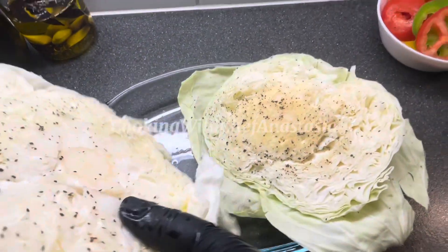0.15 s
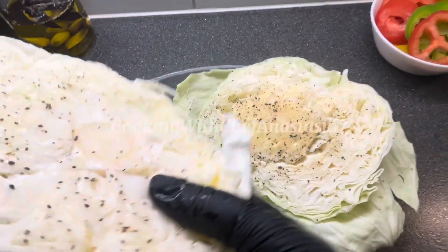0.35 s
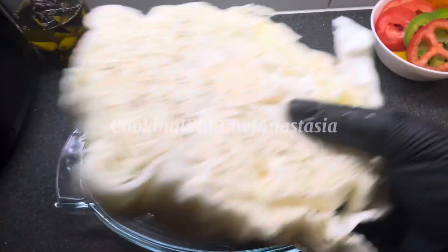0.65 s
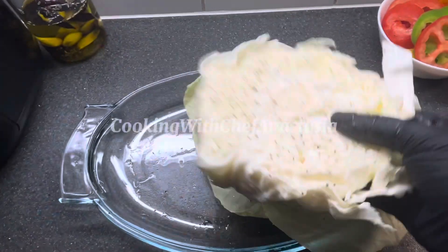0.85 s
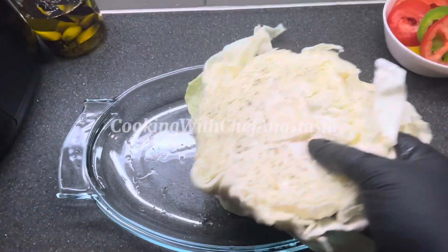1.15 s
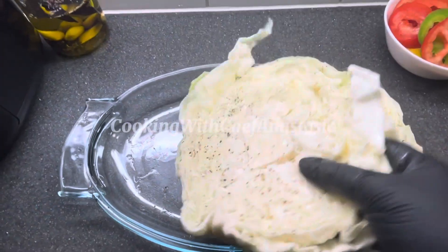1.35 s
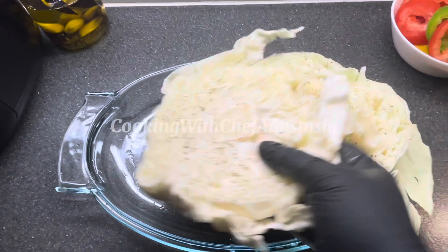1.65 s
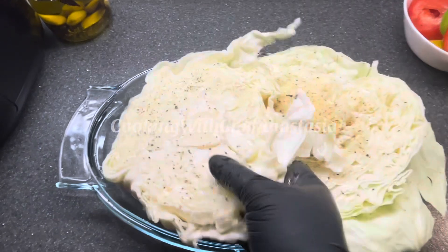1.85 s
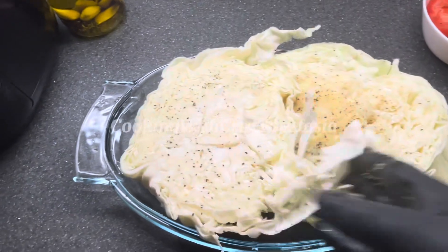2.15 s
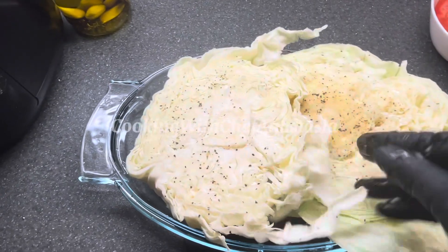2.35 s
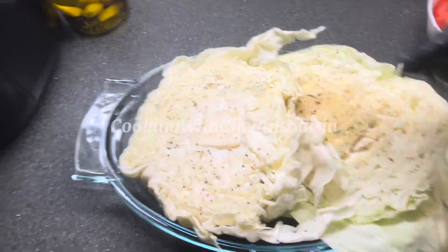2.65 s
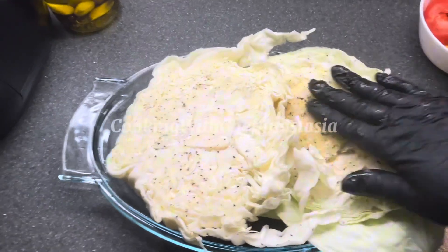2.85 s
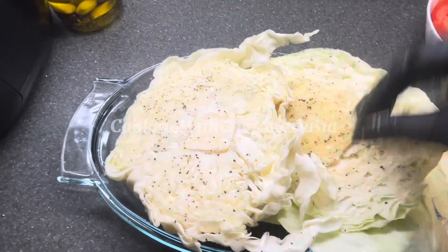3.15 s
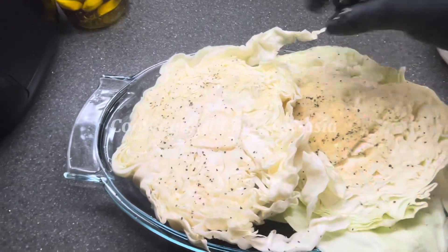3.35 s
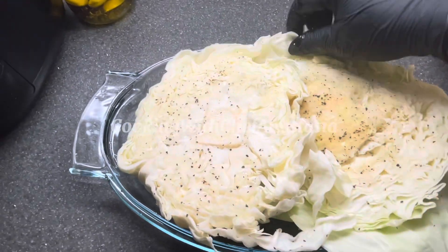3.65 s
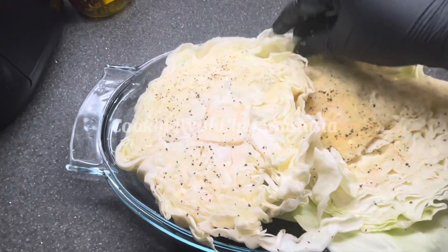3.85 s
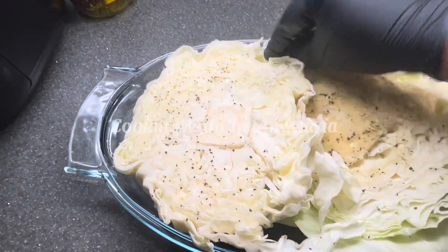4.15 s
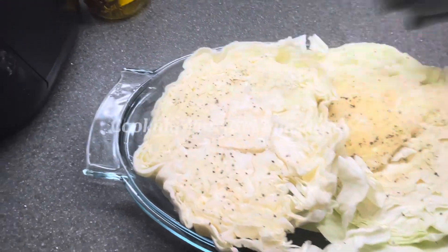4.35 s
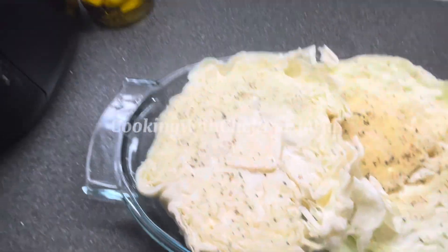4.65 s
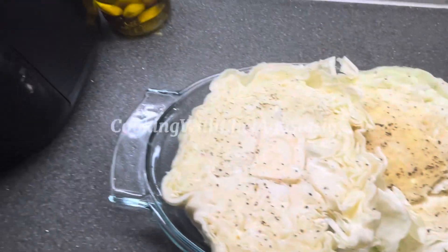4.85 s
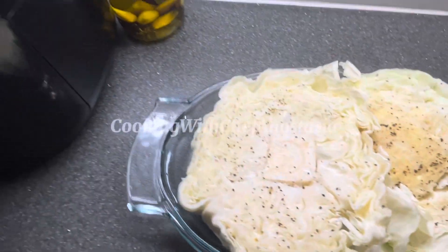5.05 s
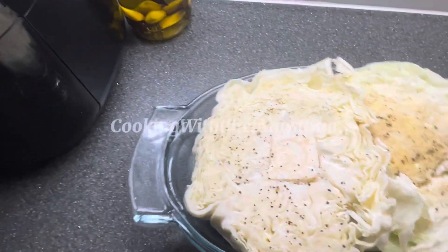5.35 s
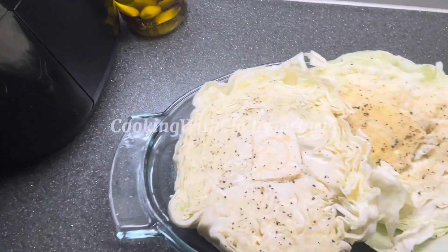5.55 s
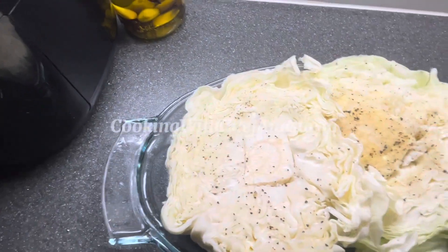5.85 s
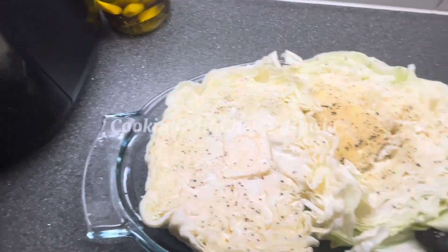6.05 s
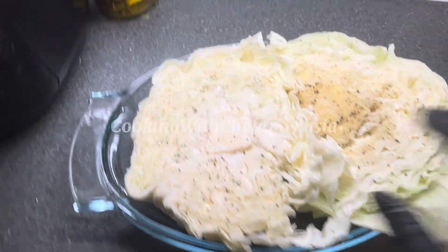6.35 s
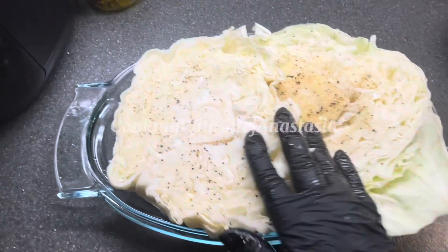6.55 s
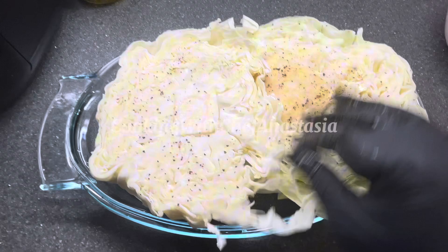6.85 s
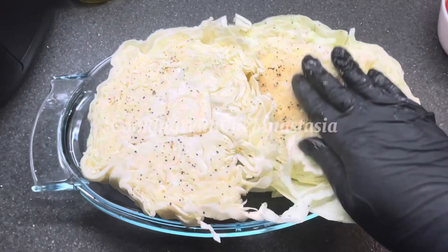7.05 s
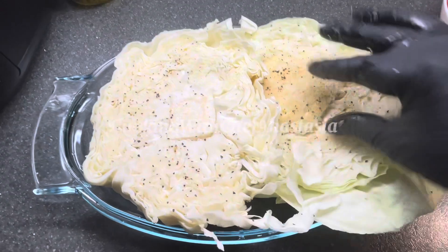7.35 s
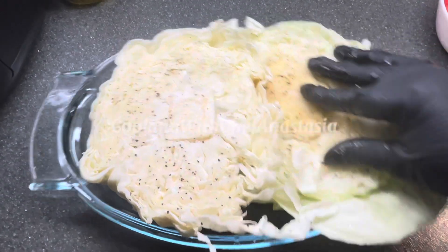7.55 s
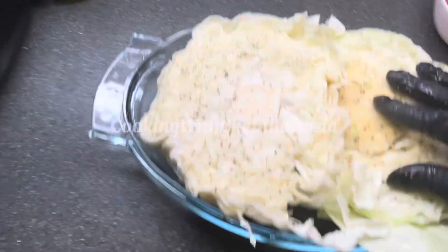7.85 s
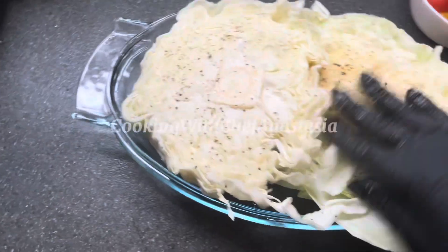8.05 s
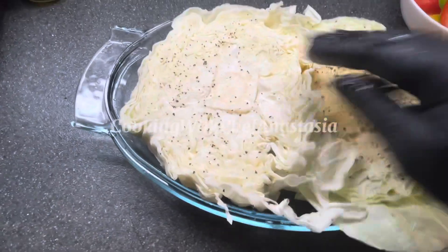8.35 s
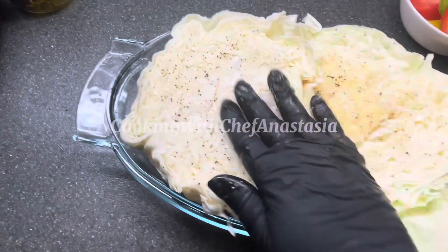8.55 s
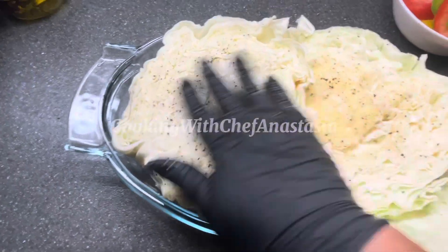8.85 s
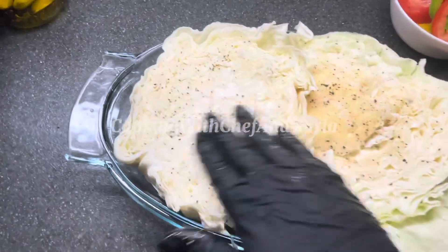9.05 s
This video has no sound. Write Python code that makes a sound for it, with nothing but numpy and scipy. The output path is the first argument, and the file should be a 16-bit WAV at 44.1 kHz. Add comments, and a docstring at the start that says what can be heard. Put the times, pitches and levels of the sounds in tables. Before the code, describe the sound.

Close, dry kitchen sound over a quiet, wavering low hum and room rumble, with very faint higher appliance tones sinking in the first second. A crisp tick opens, with a cluster of tiny fibre ticks from 0.2 to 0.6. Leafy crunches start near 0.8, with a soft thump just before 1.0; rustling builds to sharp snaps and the deepest thump at 1.8. A dull dish knock follows at 2.25, then a low bump and brief crunch at 2.8. After a lull, crackling returns at 3.5 and becomes a dense, bright crunch around 3.9-4.2. Between 4.7 and 5.9, bent ribs creak and snap, with low thumps at 5.0 and 5.3. Bright leaf snaps come near 6.1, rustles at 6.5 and a sharp tick at 7.1. A muffled double bump lands at 7.85. Light rustling from 8.5 leads to crisp crunches and faint glassy taps near 9.0, then one loud, bright snap at 9.15.

```python
"""Raw cabbage slices crackle and snap as a gloved hand presses them into a glass dish on a kitchen counter.
Leaves, ticks and glove slips are shaped noise; bent ribs creak and glass taps ring as short sine bursts.
Noise through damped modes sounds the loaded dish; the counter adds rumble and two-mode thumps.
An appliance hums behind as slowly wavering sines over low room rumble; a close two-port phone hears it all."""
import sys
import numpy as np
from scipy import signal
from scipy.fft import rfft, irfft, next_fast_len
from scipy.io import wavfile
from scipy.ndimage import uniform_filter1d, map_coordinates

SR = 44100
rng = np.random.default_rng(int(sys.argv[2]) if len(sys.argv) > 2 else 0)


def pcm_store(signal):
    """Save signal as 16-bit PCM."""
    levels = np.round(np.clip(np.atleast_2d(signal), -1, 1) * 32767)
    wavfile.write(sys.argv[1], SR, levels.astype(np.int16).T)


def volts_from_decibels(level):
    """Turn decibel levels (scalar or array-like) into linear amplitude factors."""
    exponent = np.asarray(level, float) / 20
    return 10 ** exponent


N = 405719
T = np.arange(N) / SR

# colour of thin crisp leaf edges: f/Hz, level/dB
EDGE_COLOUR = [(2500, -16), (4200, -10.5), (6500, -3.5), (8500, -3.5), (10500, 1), (11500, -6),
               (12500, -17.5), (14000, -37), (15800, -30), (16300, -90)]
# colour of thick leaf ribs: f/Hz, level/dB
RIB_COLOUR = [(350, -9), (800, -0.5), (1100, -2), (1500, -3.5), (2300, -0.5), (3800, -5), (5500, -8.5),
              (8000, -47)]


def unit(x):
    """Scaled to rms 1."""
    return x / np.sqrt(np.mean(x ** 2) + 1e-20)


def along(points, hz):
    """Interpolates (f/Hz, value) points on a log frequency axis."""
    f, v = np.transpose(points)
    return np.interp(np.log(hz + 1), np.log(f + 1), v)


def wobble(knots_per_s):
    """A smooth random curve."""
    knots = rng.standard_normal(int(N * knots_per_s / SR) + 4)
    return map_coordinates(knots, [T * knots_per_s])


def filtered(x, response):
    """x times a complex response of frequency."""
    m = next_fast_len(N + 8192)
    return irfft(rfft(x, m) * response(np.fft.rfftfreq(m, 1 / SR)), m)[..., :N]


def noise(colour):
    """Two unrelated noises of one colour, rms 1."""
    return unit(filtered(rng.standard_normal((2, N)), lambda hz: volts_from_decibels(along(colour, hz))))


def decays(times_s, levels_db, t60s_s, rise_s):
    """Sum of envelopes that rise fast and die away."""
    env = np.zeros(N + SR)
    for s, db, t60 in zip(times_s, levels_db, t60s_s):
        t = np.arange(int(t60 * SR)) / SR
        env[round(s * SR):][:len(t)] += volts_from_decibels(db - 60 * t / t60) * (1 - np.exp(-t / rise_s))
    return env[:N]


def crackle(rate_hz, spread_db, life_s, smooth):
    """Envelope of many tiny fractures of very unequal size over a smooth share."""
    sizes = volts_from_decibels(spread_db * rng.exponential(size=N).clip(0, 4))
    hits = (rng.random(N) < rate_hz / SR) * sizes
    grains = signal.lfilter([1], [1, -np.exp(-1 / (life_s * SR))], hits)
    return unit(smooth + unit(grains))


def effort(times_s, holds_s, levels_db, rise_db_per_s, fall_db_per_s, rest_db):
    """Gain: each effort climbs at a steady dB rate, holds and sinks; powers add over a resting level."""
    t = np.arange(0, N + 64, 64) / SR
    late = t - np.reshape(times_s, (-1, 1))
    after_hold = np.maximum(late - np.reshape(holds_s, (-1, 1)), 0)
    lost_db = rise_db_per_s * np.maximum(-late, 0) + fall_db_per_s * after_hold
    power = np.sum(volts_from_decibels(np.reshape(levels_db, (-1, 1)) - lost_db) ** 2, axis=0) + volts_from_decibels(rest_db) ** 2
    return np.interp(T, t, np.sqrt(power))


def hand():
    """Gains of edges and ribs as the hand strokes the leaves; between strokes a faint steady hiss remains."""
    # strokes: t/s of full effort, hold/s, settling rate/(dB/s), edge level/dB, ribs over edges/dB
    strokes = [(0.008, 0.27, 36, -73, 10.5), (0.866, 0.2, 22, -51.5, 0.5), (1.146, 0.14, 154, -48.5, 2.5),
               (1.632, 0.29, 54, -43, -4), (2.782, 0.22, 60, -51, -5), (3.583, 0.14, 50, -55.5, -0.5),
               (3.968, 0.12, 186, -40.5, -3.5), (4.823, 0.43, 35, -53, 3), (5.404, 0.44, 103, -55.5, 2.5),
               (6.107, 0.024, 81, -54, 4), (6.563, 0.066, 61, -44, -9), (7.04, 0.086, 79, -50, -1),
               (7.525, 0.59, 123, -53.5, 1.5), (8.5, 0.34, 45, -49, -9), (8.855, 0.04, 40, -54, 5)]
    swell_db_per_s, rest_edges_db, rest_ribs_db = 106, -65.5, -71.5
    s, hold, settle, db, rib_db = np.transpose(strokes)
    edge_gain = effort(s, hold, db, swell_db_per_s, settle[:, None], rest_edges_db)
    rib_gain = effort(s, hold, db + rib_db, swell_db_per_s, settle[:, None], rest_ribs_db)
    return edge_gain, rib_gain


def weight():
    """Gains of counter and dish body as weight shifts on the dish."""
    # pushes: t/s, counter level/dB, dish and cabbage body level/dB
    pushes = [(1.0, -41, -51), (1.88, -37, -51), (4.05, -48, -68), (5.1, -38, -68), (7.601, -43.5, -69),
              (7.86, -35.5, -39)]
    lean_db_per_s, lift_db_per_s, rest_counter_db, rest_body_db = 79, 161, -52, -79
    s, counter_db, body_db = np.transpose(pushes)
    counter_gain = effort(s, 0, counter_db, lean_db_per_s, lift_db_per_s, rest_counter_db)
    body_gain = effort(s, 0, body_db, lean_db_per_s, lift_db_per_s, rest_body_db)
    return counter_gain, body_gain


def crunch(length_s, edge_db, rib_db, rib_hz, swell, tail_t60_s):
    """One burst: it swells, lasts while the leaf gives way, then dies in the room."""
    t = np.arange(next_fast_len(round((length_s + 0.11) * SR))) / SR
    fade_db = 60 * np.maximum(t - length_s, 0) / tail_t60_s + 3 * t / length_s
    env = (1 - np.exp(-t / (swell * length_s))) * volts_from_decibels(-fade_db)
    # slower tail, stronger after a long break
    tail = volts_from_decibels(-60 * t / 0.19) * length_s / (length_s + 0.0043) * (t > length_s)
    env = np.maximum(env, tail)

    hz = np.fft.rfftfreq(len(t), 1 / SR)
    # the bent rib rings in one band above the broad colour, most clearly in a short snap
    clear = 0.024 / length_s
    band = clear / (1 + (7 * (hz / rib_hz - rib_hz / (hz + 1))) ** 2)

    def burst(spectrum):
        return unit(irfft(rfft(rng.standard_normal((2, len(t)))) * spectrum, len(t)))

    edges = burst(volts_from_decibels(along(EDGE_COLOUR, hz)))
    ribs = burst(volts_from_decibels(along(RIB_COLOUR, hz)) * (0.5 + band))
    return env * (volts_from_decibels(edge_db) * edges + volts_from_decibels(rib_db) * ribs)


def leaves():
    """Thin edges and thick ribs break in clumps: a fine rustle with distinct crunches on top."""
    # crunches and snaps: t/s, length/s, edge level/dB, rib level/dB, rib ring f/Hz
    crunches = [(0.235, 0.0091, -45, -49, 3500), (0.767, 0.043, -35.5, -38.5, 2550),
                (0.849, 0.036, -33.5, -38, 1510), (1.273, 0.033, -35.5, -37.5, 2200),
                (1.355, 0.039, -39.5, -51, 2920), (1.409, 0.0098, -38.5, -64, 4500),
                (1.495, 0.026, -38, -53, 3000), (1.803, 0.018, -28.5, -33, 2330),
                (2.778, 0.022, -36.5, -35.5, 1040), (2.794, 0.021, -41, -36, 980),
                (3.654, 0.02, -32, -39.5, 1210), (3.696, 0.006, -29.5, -36.5, 1040),
                (3.752, 0.024, -32, -47.5, 1423), (3.853, 0.0088, -34.5, -54, 750),
                (3.892, 0.018, -30, -47.5, 1560), (3.964, 0.06, -24, -35, 2260),
                (4.036, 0.017, -25.5, -36.5, 1330), (4.068, 0.027, -25.5, -49, 2840),
                (4.137, 0.04, -31, -46, 4000), (4.188, 0.012, -30.5, -47, 1390),
                (4.793, 0.014, -38, -35.5, 1780), (4.902, 0.014, -31.5, -34.5, 796),
                (5.032, 0.049, -38, -36.5, 2770), (5.261, 0.061, -34.5, -36, 2780),
                (5.331, 0.0121, -35, -35, 960), (5.569, 0.041, -35, -37.5, 3220),
                (5.647, 0.025, -40, -40, 1990), (6.103, 0.021, -36, -42, 3450),
                (6.462, 0.057, -35.5, -44, 1690), (6.632, 0.028, -35, -44.5, 715),
                (6.677, 0.078, -41.5, -49.5, 860), (7.131, 0.011, -30, -37.5, 3600),
                (7.391, 0.024, -40.5, -46, 2640), (7.851, 0.024, -40, -39.5, 850),
                (8.47, 0.023, -38.5, -34, 2300), (8.96, 0.0073, -30, -41, 1570),
                (9.035, 0.018, -28.5, -50, 2620)]
    edge_gain, rib_gain = hand()
    clumps_db = 0.85 * wobble(30)
    edges = edge_gain * volts_from_decibels(clumps_db + 2.6 * wobble(11)) * noise(EDGE_COLOUR)
    ribs = rib_gain * volts_from_decibels(clumps_db) * noise(RIB_COLOUR)
    rustle = (edges + ribs) * crackle(rate_hz=700, spread_db=4.3, life_s=0.0007, smooth=1.5)
    # the rustle is kept below about 12 kHz
    rustle = filtered(rustle, lambda hz: volts_from_decibels(along([(11800, -0.5), (12800, -64)], hz)))

    bursts = np.zeros((2, N + SR))
    for s, *row in crunches:
        one = crunch(*row, swell=0.15, tail_t60_s=0.15)
        bursts[:, round(s * SR):][:, :one.shape[1]] += one
    return rustle + bursts[:, :N] * crackle(rate_hz=330, spread_db=3.2, life_s=0.0015, smooth=1.1)


def dish():
    """Rubbing and knocks drive the damped modes of the loaded dish."""
    # dull knocks: t/s, level/dB, t60/s
    knocks = [(0.934, -34, 0.15), (1.411, -42, 0.22), (1.739, -35.5, 0.092), (1.801, -29.5, 0.21),
              (2.245, -29.5, 0.51), (2.49, -45.5, 0.23), (4.002, -38, 0.11), (5.342, -33, 0.095),
              (7.516, -44, 0.3), (7.838, -37, 0.13)]
    # modes of the loaded dish: f/Hz, width/Hz, level/dB
    dish_modes = [(248, 22, -10), (330.5, 22, 3.5), (401.5, 62, 5), (510, 66, 1.5), (644, 56, 3.5),
                  (739, 58, -2.5), (980, 68, -5)]
    rub_db, rub_follows = -61, 0.43  # rms level; dB gained per dB of hand effort
    s, db, t60 = np.transpose(knocks)
    rub = volts_from_decibels(rub_db) * unit(hand()[1] ** rub_follows)
    steady = np.hypot(rub, weight()[1]) * volts_from_decibels(3.9 * wobble(25))
    force = steady + decays(s, db, t60, rise_s=0.0016)

    def dull_modes(f):
        total = 0
        for k, (centre, width, gain_db) in enumerate(dish_modes):
            mode = 1j * f * width / (centre * centre - f * f + 1j * f * width)
            total = total + (-1) ** k * volts_from_decibels(gain_db) * mode
        # the dish sounds only dull, below about 1.4 kHz
        return total / (1 + (f / 1400) ** 4)

    return force * unit(filtered(rng.standard_normal((2, N)), dull_modes))


def counter():
    """Shifting weight rumbles in the counter; each thump is a few swings of two low modes."""
    # thumps: t/s, level/dB, lower mode f/Hz
    thumps = [(0.957, -21, 192), (1.827, -12, 146), (2.79, -21, 119.6), (4.65, -26.5, 178),
              (5.028, -16, 152), (5.305, -18.5, 126), (5.343, -16, 174.5), (7.837, -23.5, 218),
              (7.874, -21, 183)]
    # rumble colour: f/Hz, level/dB
    rumble_colour = [(60, -20), (95, 5.5), (120, 12), (170, 3), (270, -7), (340, -58.5)]
    rumble = weight()[0] * volts_from_decibels(2.8 * wobble(14)) * noise(rumble_colour)
    out = np.pad(rumble, ((0, 0), (0, SR)))
    t = np.arange(SR // 4) / SR
    for s, db, hz in thumps:
        env = volts_from_decibels(db - 60 * t / 0.08) * (1 - np.exp(-t / 0.0039))
        swings = np.sin(2 * np.pi * hz * t) + 0.47 * np.sin(2 * np.pi * 1.753 * hz * t)
        out[:, round(s * SR):][:, :len(t)] += env * swings
    return out[:, :N]


def kitchen():
    """A wavering appliance hum, faint higher tones that sink within about a second, and low room rumble."""
    # hum: mean f/Hz, rms level/dB
    hum_tone = [(48.4, -54)]
    # higher appliance tones: mean f/Hz, relative level/dB
    whine_tones = [(366.1, -74), (414.5, -70), (484.5, -72)]
    # room rumble colour: f/Hz, level/dB
    room_colour = [(45, -10), (70, -11.5), (119, 0), (172, -15), (245, -22), (285, -31.5), (400, -22),
                   (800, -72)]

    def tone(hz):
        return np.sin(2 * np.pi * np.cumsum(hz) / SR)

    (hum_hz, hum_db), = hum_tone
    hum_gain = volts_from_decibels(hum_db + 3 + 0.31 * wobble(2.9))  # +3 dB: rms to sine peak
    hum = hum_gain * tone(hum_hz + 0.695 * wobble(1.8))
    whine = 0
    for hz, db in whine_tones:
        whine = whine + np.sqrt(2) * volts_from_decibels(db + 2.4 * wobble(1.62)) * tone(hz + 0.4 * wobble(3))
    sink_db = 5 * np.exp(-(T / 0.85) ** 4) - 3
    rumble = volts_from_decibels(-51 + 1.9 * wobble(3.86)) * noise(room_colour)
    return hum + whine * volts_from_decibels(sink_db) + rumble


def ticks():
    """Single fibres break in a millisecond or two, with a faint room tail."""
    # dry ticks: t/s, level/dB, ribs over edges/dB
    fibre_breaks = [(0.019, -20.5, -11), (0.2226, -36, 7), (0.245, -22.5, -3), (0.326, -33.5, -3),
                    (0.3588, -31.5, 3.5), (0.374, -23, -5), (0.404, -36, 8.5), (0.415, -27.5, 0.5),
                    (0.428, -28, 2), (0.4455, -32.5, 5), (0.462, -31.5, -1), (0.487, -34.5, 5.5),
                    (0.561, -39.5, 3), (1.1256, -21, -5), (1.299, -27.5, 6.5), (1.3096, -32, 3),
                    (1.5516, -21.5, 1.5), (1.572, -22, 0), (1.7986, -13, -3.5), (1.811, -13.5, -4),
                    (3.431, -43, -6), (3.5224, -28, 1), (3.611, -28.5, -2), (5.021, -22, 3),
                    (5.215, -25, -4.5), (5.782, -29, -3), (5.795, -30.5, 2), (5.82, -30, -1),
                    (5.862, -20.5, -8), (6.038, -22, -17), (6.0736, -14.5, -9.5), (6.309, -50.5, 16.5),
                    (6.962, -25, 4), (7.0589, -26.5, -15), (7.1324, -16.5, -8), (9.1606, -9, -15.5)]
    s, db, share_db = np.transpose(fibre_breaks)

    def shape(level_db):
        direct = decays(s, level_db, np.full_like(s, 0.007), rise_s=0.00059)
        tail = decays(s, level_db - 16.5, np.full_like(s, 0.08), rise_s=0.0016)
        return direct + tail

    snaps = shape(db) * noise(EDGE_COLOUR) + shape(db + share_db) * noise(RIB_COLOUR)
    # the break itself is one sharp click in the shared row
    click = np.zeros(N)
    click[np.round(s * SR).astype(int) + 20] = volts_from_decibels(db + 6) * rng.choice([-1, 1], len(s))
    share = np.interp(T, s, volts_from_decibels(share_db))
    edge_click = filtered(click, lambda hz: volts_from_decibels(along(EDGE_COLOUR, hz)))
    rib_click = filtered(click, lambda hz: volts_from_decibels(along(RIB_COLOUR, hz)))
    snaps[0] += edge_click + share * 2 * rib_click
    # a fibre is too small to radiate low notes
    return filtered(snaps, lambda hz: 1 / (1 + (1300 / (hz + 1)) ** 3))


def glove():
    """The glove slips over a waxy leaf: a thin hiss swells and fades smoothly in one band."""
    # slips: t/s, length/s, level/dB, centre f/Hz
    slips = [(2.95, 0.32, -64.5, 2700), (3.961, 0.038, -27, 10700), (5.563, 0.045, -31.5, 10630),
             (6.083, 0.043, -29.5, 10400)]
    relative_width = 0.14  # band width over its centre

    def band(centre_hz):
        def response(hz):
            return np.exp(-((hz / centre_hz - 1) / relative_width) ** 2)
        return unit(filtered(rng.standard_normal((2, N)), response))

    out = np.zeros((2, N))
    for s, length, db, hz in slips:
        env = np.exp(-(2 * (T - s - length / 2) / length) ** 2)
        out += volts_from_decibels(db) * env * band(hz)
    return out


def glass():
    """A tap rings the lowest glass mode; a harder contact adds the high ones."""
    # taps: t/s, level/dB, extra level of the high modes/dB
    taps = [(3.614, -60, -46), (6.312, -66.5, -49), (8.09, -61, -21), (8.961, -51, 10), (9.045, -56, 24.5)]
    # glass modes: f/Hz, relative level/dB, t60/s
    glass_modes = [(1498.4, 16, 0.22), (2650, -4, 0.047), (6900, 1, 0.13), (7500, 4, 0.16),
                   (10700, 5, 0.038)]
    out = np.zeros((2, N + SR))
    t = np.arange(SR // 3) / SR
    for s, db, bright_db in taps:
        for k, (hz, mode_db, t60) in enumerate(glass_modes):
            phase = rng.uniform(0, 2 * np.pi, (2, 1))
            level_db = db + mode_db + bright_db * (k > 0)
            gain = volts_from_decibels(level_db - 60 * t / t60) * (1 - np.exp(-t / 0.00084))
            out[:, round(s * SR):][:, :len(t)] += gain * np.sin(2 * np.pi * hz * t + phase)
    return out[:, :N]


def creaks():
    """A bent rib gives way: a few rough, unsteady swings with a weak overtone, in the shared row."""
    # creaks: t/s, length/s, level/dB, f/Hz
    rib_creaks = [(4.714, 0.0048, -45, 2750), (4.797, 0.011, -29.5, 2940), (4.828, 0.007, -35, 950),
                  (4.879, 0.0047, -36, 930), (4.93, 0.012, -33.5, 968), (5.0195, 0.0042, -17.5, 880),
                  (5.264, 0.015, -34, 980), (5.654, 0.0059, -32, 1000), (5.664, 0.012, -34.5, 1015),
                  (5.846, 0.02, -37, 1003), (6.106, 0.018, -34.5, 1628), (6.12, 0.012, -37.5, 1026)]
    out = np.zeros((2, N + SR))
    drift = wobble(500)
    for s, length, db, hz in rib_creaks:
        start = round(s * SR)
        t = np.arange(round(2 * length * SR)) / SR
        phase = 2 * np.pi * hz * t + 0.9 * drift[start:][:len(t)]
        rough = volts_from_decibels(4 * drift[-start:][:len(t)])  # another stretch of the same curve
        env = (1 - np.exp(-t / 0.0011)) * np.exp(-(t / length) ** 4) * rough
        out[0, start:][:len(t)] += volts_from_decibels(db) * env * (np.sin(phase) + 0.29 * np.sin(2 * phase))
    return out[:, :N]


def patchy(x, depth_db):
    """The crackle's colour varies at random: one gain per patch about 860 Hz wide and 9 ms long."""
    z = signal.stft(x, nperseg=256)[2]
    field = uniform_filter1d(rng.standard_normal(z.shape[1:]), size=5, axis=0)
    field = uniform_filter1d(field, size=3, axis=1)
    gain = volts_from_decibels(depth_db * unit(field))
    return signal.istft(z * unit(gain), nperseg=256)[1][:, :N]


def scene():
    """Row one is what both ports share, row two what differs between them."""
    cabbage = patchy(leaves() + glove(), depth_db=2.8) + ticks() + creaks()
    return cabbage + dish() + counter() + glass() + kitchen()


def top_cut(x):
    """Nothing passes above the cut-off."""
    return signal.sosfilt(signal.butter(12, 16510, fs=SR, output="sos"), x)


def record(dry):
    """Two ports hear partly unlike sound with a phase lead; the right is stronger in the bass."""
    # phase by which the left port leads: f/Hz, lead/rad
    left_lead = [(250, 0.14), (600, 1.21), (1500, 0.2), (4200, 0.4), (4800, 3), (5600, 5.9), (6500, 6.3),
                 (8000, 8.61), (9300, 9.26), (11800, 11.72), (13800, 12.5), (15000, 15.6)]
    # likeness of the ports: f/Hz, likeness 0-1
    likeness = [(200, 1), (650, 0.59), (1600, 1), (3300, 0.3), (6000, 0.7), (7500, 0.87), (9200, 1),
                (11000, 0.82), (12000, 0.97)]
    sides = np.array([[0.5], [-0.5]])  # left, right

    def split(hz):
        angle = np.arccos(np.clip(along(likeness, hz), 0, 1)) / 2
        return np.array([np.cos(angle), np.sin(angle)])

    def ports(hz):
        tilt_db = along([(250, -2.5), (600, -0.14)], hz)  # left over right
        lead = np.interp(hz, *np.transpose(left_lead))
        return (hz > 36) * volts_from_decibels(tilt_db * sides) * np.exp(1j * lead * sides)

    same, unlike = filtered(dry, split)
    mix = filtered(np.array([same + unlike, same - unlike]), ports)
    return top_cut(mix)


dry = scene()
out = record(dry)
pcm_store(out)
```